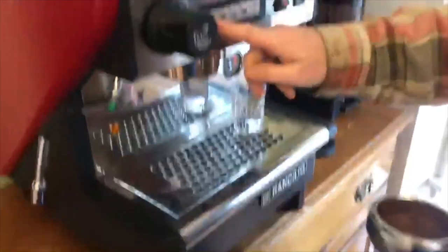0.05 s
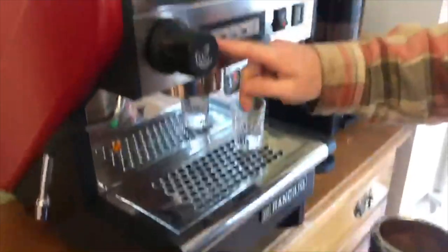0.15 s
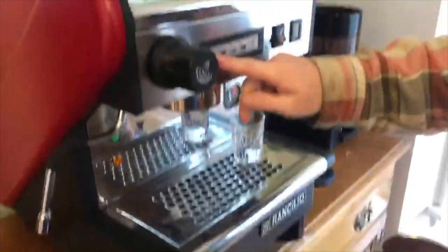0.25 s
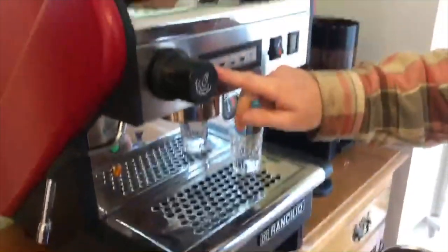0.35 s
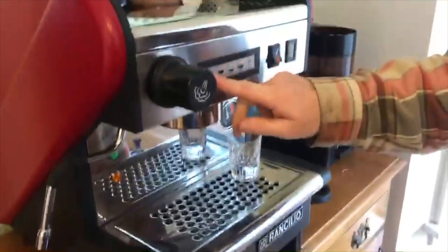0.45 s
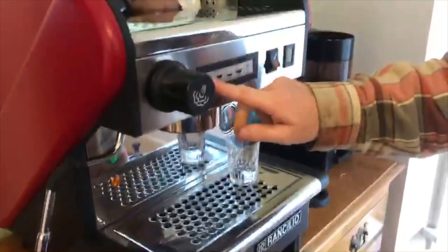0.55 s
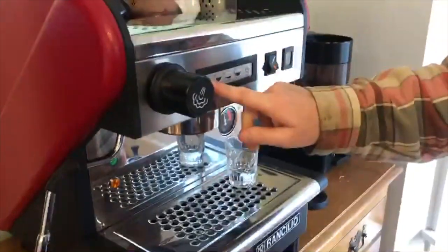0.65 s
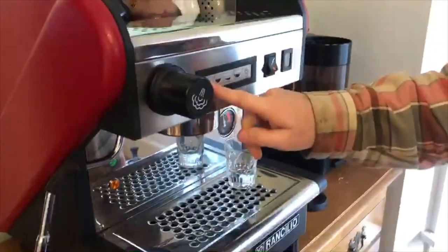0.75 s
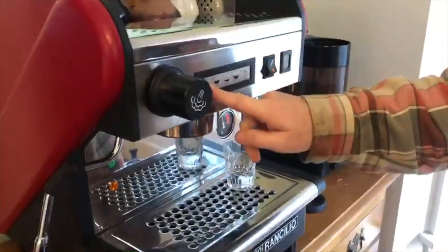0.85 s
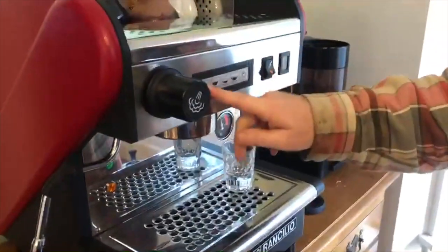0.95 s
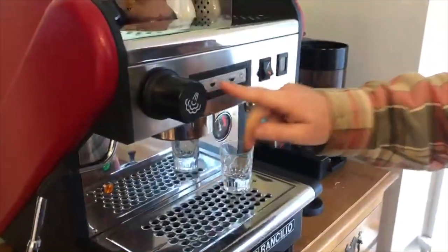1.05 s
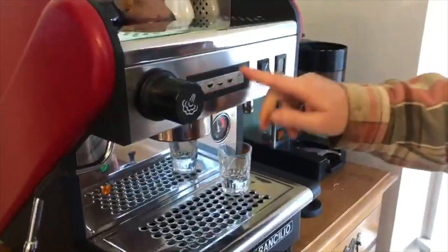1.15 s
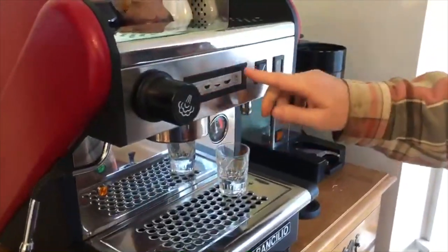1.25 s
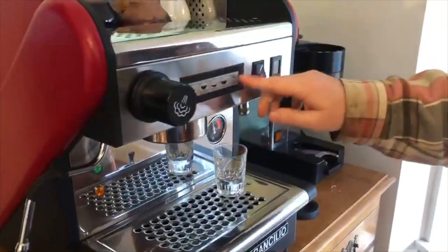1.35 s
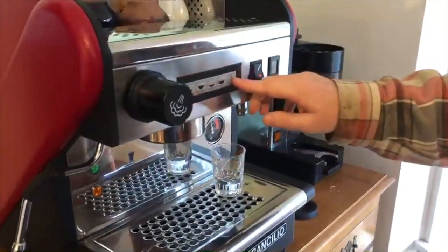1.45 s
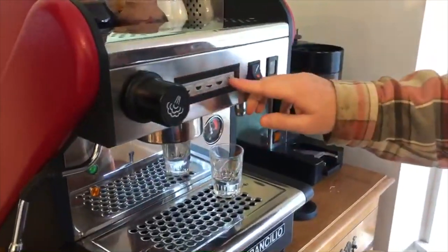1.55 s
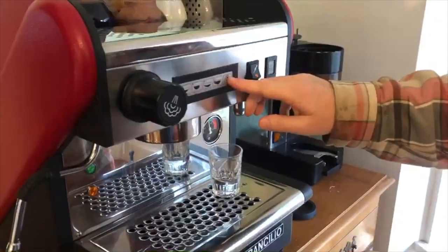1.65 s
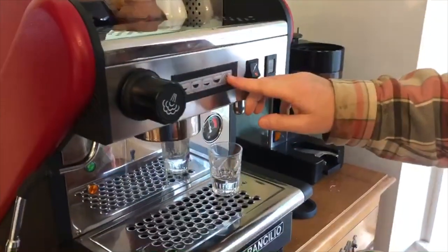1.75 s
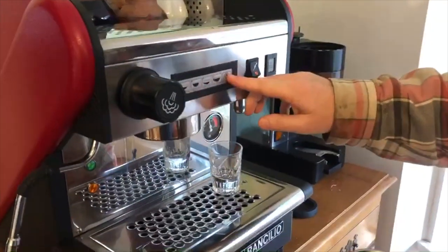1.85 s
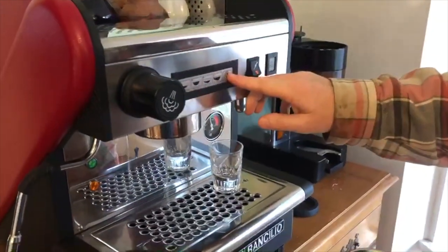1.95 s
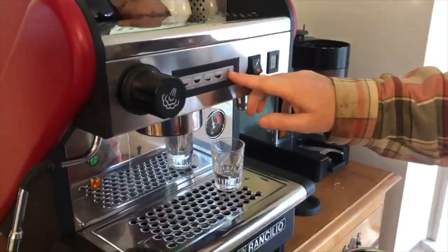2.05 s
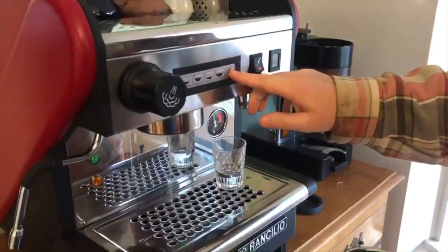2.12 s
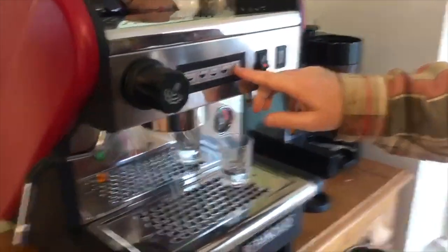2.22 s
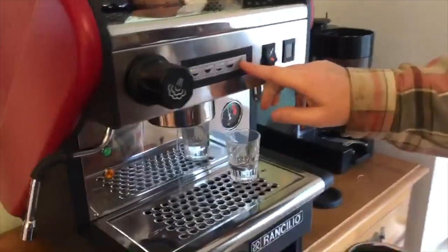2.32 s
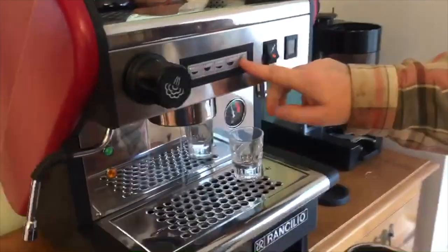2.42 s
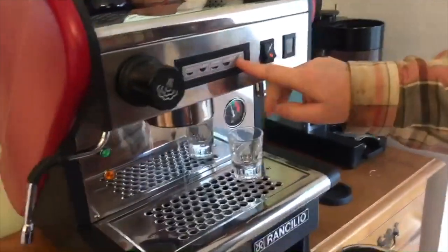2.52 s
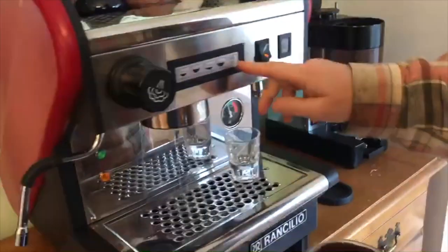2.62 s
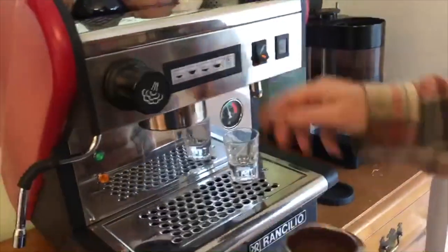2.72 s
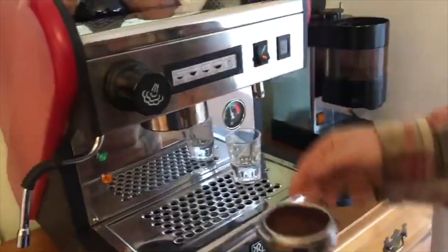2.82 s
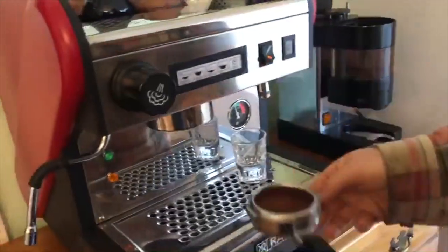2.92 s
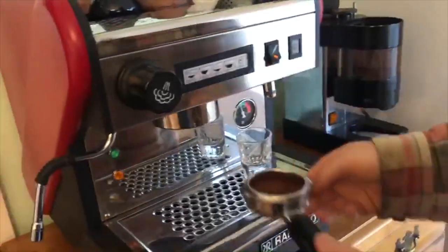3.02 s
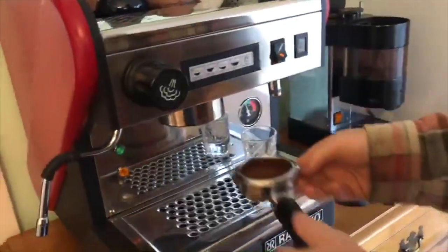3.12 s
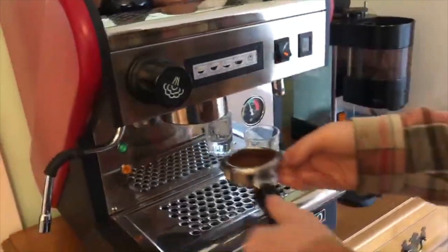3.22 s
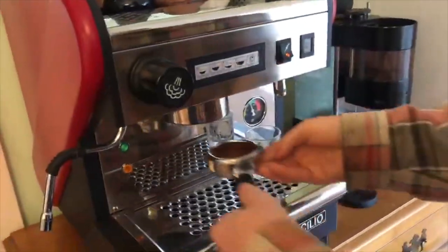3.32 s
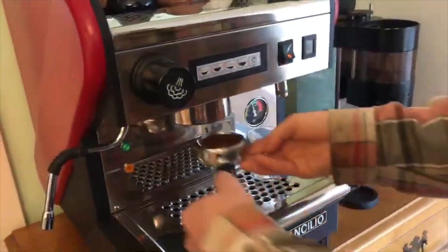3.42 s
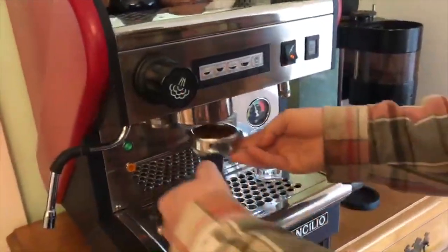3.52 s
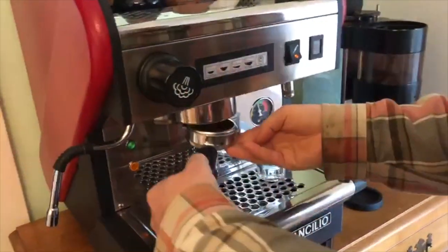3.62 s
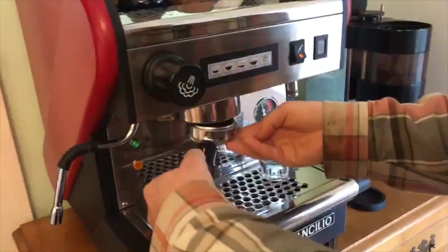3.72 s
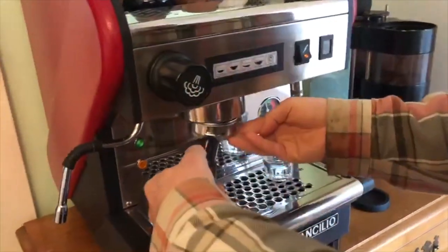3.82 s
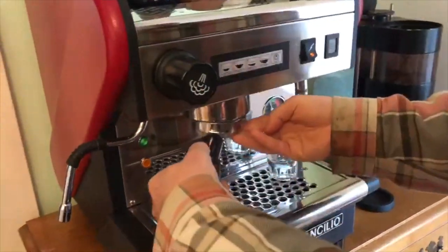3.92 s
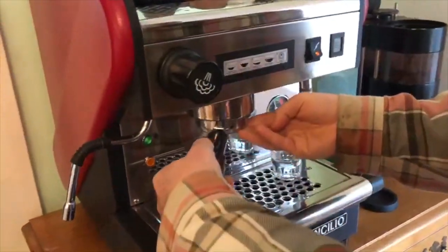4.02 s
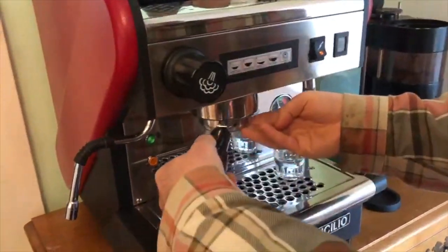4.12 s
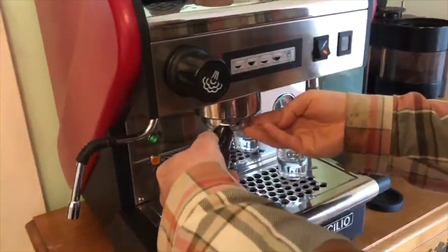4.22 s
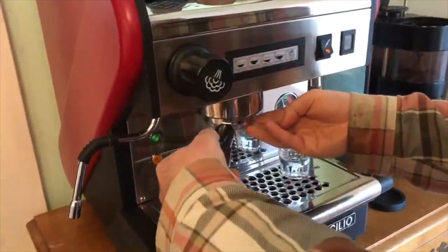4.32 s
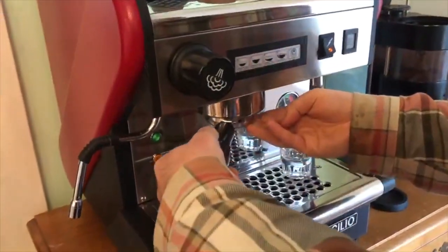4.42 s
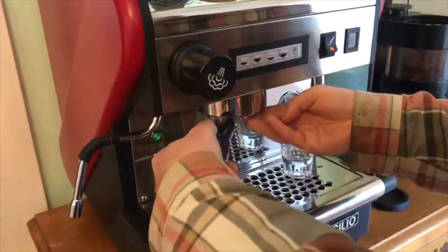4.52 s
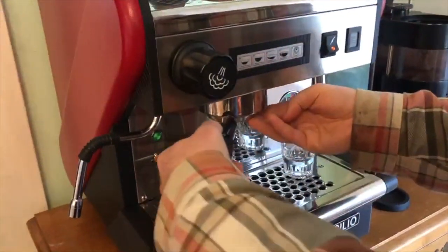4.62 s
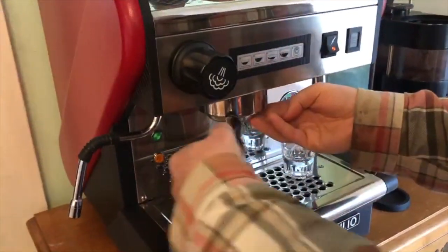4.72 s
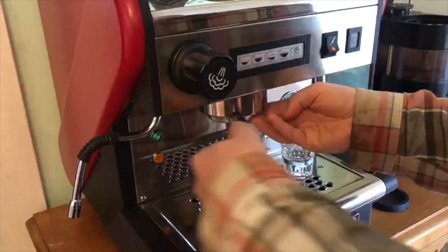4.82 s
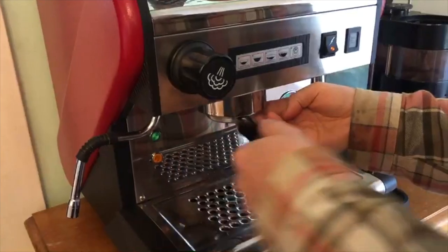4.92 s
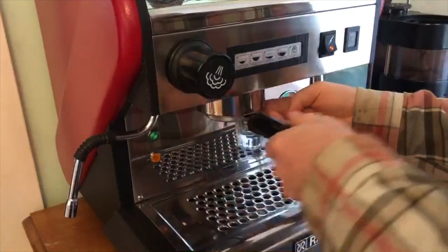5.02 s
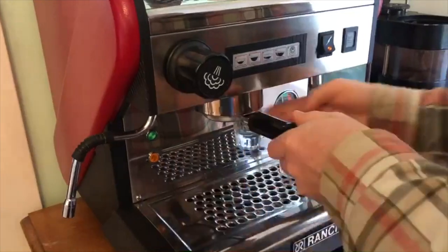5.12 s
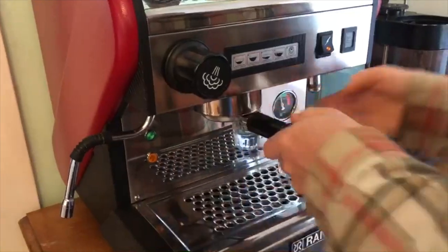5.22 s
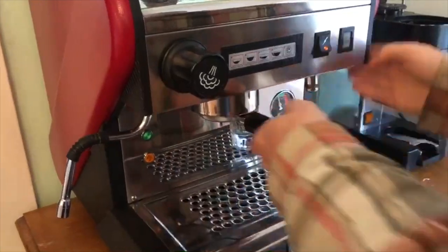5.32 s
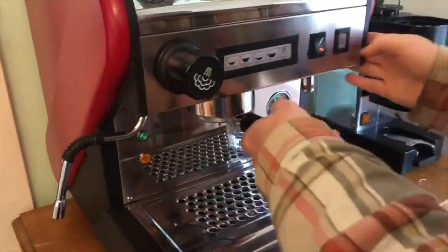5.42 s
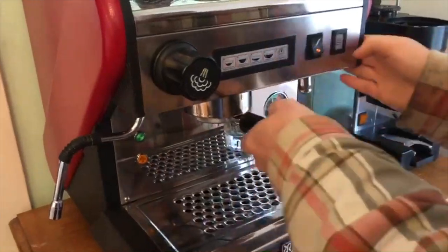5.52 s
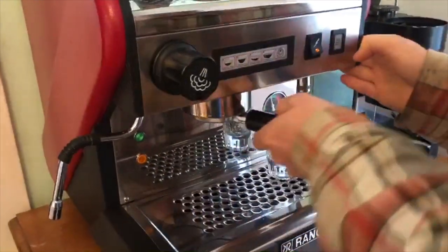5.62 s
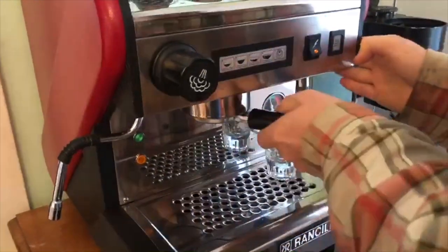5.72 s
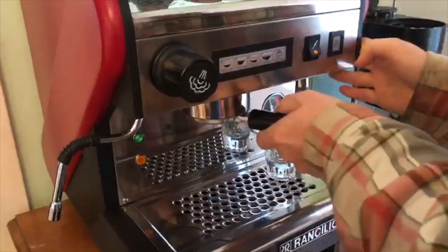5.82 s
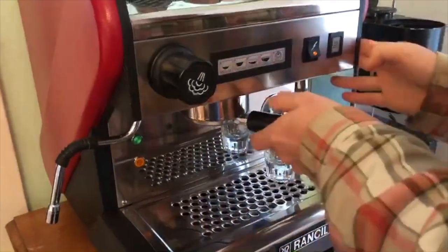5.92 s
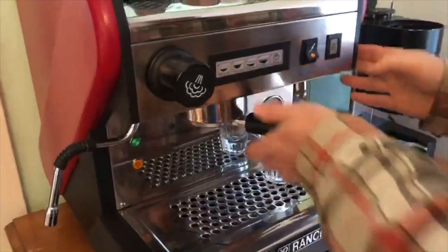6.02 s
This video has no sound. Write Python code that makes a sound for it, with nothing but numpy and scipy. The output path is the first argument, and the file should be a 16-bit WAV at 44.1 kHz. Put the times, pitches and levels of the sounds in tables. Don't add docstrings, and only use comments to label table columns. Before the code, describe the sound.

A small handheld microphone near an espresso machine. Soft fingertip touches lead to a bright, crisp button click that rattles the front panel. A low motor hum with a thin whine and hissing water runs about a second and a half, with irregular drips, and winds down. Quiet cloth rustle follows, then solid metal clunks, a short grinding twist of the handle, and faint taps in a lightly reverberant kitchen.

```python
import sys
import numpy as np
from scipy import signal
from scipy.fft import rfft, irfft
from scipy.io import wavfile
from scipy.ndimage import uniform_filter1d

SR = 44100
rng = np.random.default_rng(int(sys.argv[2]) if len(sys.argv) > 2 else 0)


def unload_wav(signal):
    wavfile.write(
        sys.argv[1],
        SR,
        np.round(np.clip(np.atleast_2d(signal).T, -1, 1) * 32767).astype(np.int16),
    )


def how_loud(loudness_db):
    steps = np.asarray(loudness_db, float) / 20
    return 10 ** steps


N = 267246
T = np.arange(N) / SR

SHAFT_HZ, MAINS_HZ, ROTOR_SLOTS = 28.53, 120, 34
VALVE_S, UP_TO_SPEED_S, POWER_OFF_S = 0.84, 1.0, 2.465
SWITCH_S, SWITCH_DB = 0.7972, -18

# mains sideband step (negative: mains hum itself), level in dB.
SLOT_LINES = [(-4.5, -8), (2, -10), (3, 0.5), (-34, -33)]
# shaft order, level in dB re rumble.
SHAFT_ORDERS = [(2, -11), (7, -9.5), (8, -11.5), (11, -18), (14, -24.5), (15, -18), (18, -16), (20, -18.5),
                (22, -16), (30, -16)]
# shaft order, level in dB.
VANE_ORDERS = [(23, -10.5), (24, -2), (25, -5.5), (26, -11.5), (27, -16)]
# frequency in Hz, density in dB per Hz.
RUMBLE_SPECTRUM = [(20, -50), (38, -23), (55, -2.5), (100, -6.5), (140, -3.5), (175, -4), (220, -3),
                   (300, -5), (480, -12.5), (680, -11.5), (1000, -14.5), (1450, -18.5), (2200, -47)]
# frequency in Hz, density in dB per Hz.
HISS_SPECTRUM = [(880, -37), (1500, 4), (1710, -2.5), (3250, -6.5), (5440, -9.5), (6180, -9), (9470, -16),
                 (10100, -18), (15000, -18.5), (15700, -17.5), (16500, -20.5)]
# frequency in Hz, level in dB.
PIPE_TONES = [(4082, -75), (4422, -79.5), (4592, -81), (5050, -78), (5249, -73.5), (5336, -80.5),
              (5421, -73), (5453, -77.5), (5483, -79.5), (5593, -80.5), (5650, -75), (5906, -77),
              (6021, -81), (6534, -80), (6966, -77.5), (7180, -78.5), (7768, -82), (9518, -84.5)]
# centre in Hz, width in Hz, level in dB.
PIPE_RESONANCES = [(1860, 61, -9.5), (5400, 700, -5), (6500, 300, -15.5), (7680, 220, -15.5),
                   (8500, 400, -14), (9100, 150, -16), (9470, 160, -11.5), (10800, 220, -19.5)]
# time in seconds, ease in dB.
FLOW_EASE = [
    (.976, 14.5),
    (1.06, -1),
    (1.52, 0.5),
    (1.555, -3.5),
    (1.65, 2.5),
    (1.7, -3.5),
    (2.116, 2.5),
    (2.22, 1),
    (2.46, 2.5),
]
# start in seconds, peak in dB, pitch in Hz.
DRIPS = [(0.9837, -58, 2200), (1.1489, -34.5, 2500), (1.2192, -40.5, 1900), (1.3373, -45, 1960),
         (1.4002, -44, 2770), (1.4666, -51, 2760), (1.5963, -43, 1910), (1.6363, -38.5, 2010),
         (1.6845, -43, 3250), (1.8018, -36.5, 2450), (1.8687, -49, 1910), (1.9797, -45, 1910),
         (2.1044, -46, 2970), (2.164, -38, 3000), (2.1778, -36, 1850), (2.2917, -40, 1960),
         (2.454, -47.5, 2150)]
# frequency in Hz, level in dB, T60 in seconds.
TRAY_MODES = [(1910, -4.5, 0.08), (2097, -1, 0.032), (2550, -11, 0.048), (3000, -8.5, 0.032),
              (3360, 0.5, 0.039), (3810, -9, 0.046)]

# frequency in Hz, density in dB per Hz.
SWITCH_SPECTRUM = [(180, -59.5), (300, -28.5), (828, -15.5), (2100, -9.5), (3350, -11.5), (4370, -24),
                   (6100, -6), (7080, -20), (8500, -3.5), (11900, -3.5), (12900, -19), (15200, 0.5),
                   (16000, -17)]
# frequency in Hz, density in dB per Hz.
RATTLE_SPECTRUM = [(240, -45.5), (400, -19.5), (742, -7), (879, -4.5), (1250, -11), (1710, -3),
                   (2020, -12.5), (3370, -9), (4730, -25.5), (8370, -11.5), (16000, -16.5)]
# frequency in Hz, level in dB, T60 in seconds.
ROCKER_MODES = [(1900, -4.5, 0.013), (2500, -9.5, 0.016), (6250, -12.5, 0.018), (8860, -1, .014),
                (9600, -5.5, .018), (10790, 0.5, .015), (11910, 1, 0.011), (13200, -6, .012),
                (13970, -6, 0.014), (15200, -4.5, 0.015)]
# frequency in Hz, level in dB, T60 in seconds.
FRONT_PANEL_MODES = [(873, -10, 0.15), (1420, -12.5, 0.12), (1800, -13, 0.2), (2170, 2.5, 0.17),
                     (2800, -6, .2), (3300, -8, .2), (6116, -7.5, 0.32), (9100, -9.5, 0.15),
                     (9390, -10, 0.23), (9430, -5, 0.073), (10090, -13.5, 0.46), (10860, -14, 0.13),
                     (11270, -18.5, 0.51), (12500, -11, 0.23), (14060, -7, 0.2057), (15000, -6.5, 0.29),
                     (15370, -10.5, 0.18)]

# start in seconds, crack in dB, crack
# colour in Hz, body in dB, body colour in Hz.
KNOCKS = [(0.2716, -57.5, 3460, -57.5, 1030), (3.7979, -23.5, 3570, -31.5, 670),
          (4.1091, -42.5, 3300, -38, 940), (4.2645, -49, 2800, -41.5, 836), (4.4607, -27, 3400, -31.5, 590),
          (4.7077, -44.5, 3260, -41, 594), (4.8062, -29.5, 4930, -42, 706), (4.9273, -31, 3530, -43, 940),
          (5.523, -40.5, 1710, -48.5, 1000), (5.6843, -46.5, 2290, -54, 960),
          (5.8504, -57.5, 2000, -56, 790)]
# start in seconds, crack in dB, body in dB, thud in dB.
TOUCHES = [(0.0004, -68, -62, -49), (0.082, -64, -79, -62), (3.6496, -62, -70, -76),
           (3.7314, -64, -72, -71), (4.499, -58.5, -46.5, -33), (4.5595, -58, -78, -43.5),
           (4.6686, -61, -60, -49), (5.0419, -57, -76, -57), (5.6467, -56, -59, -48.5),
           (5.662, -51, -65, -59), (5.7339, -66, -61, -49.5), (5.8975, -57.5, -84, -80),
           (5.9532, -58, -74, -74), (5.9976, -56, -52.5, -51)]
# frequency in Hz, level in dB, T60 in seconds.
SHEET_MODES = [(1644, 16.5, 0.33), (1723, 1, 0.72), (2000, 9, 0.17), (2290, -12, 0.36), (2470, 4, 0.056),
               (2860, 9, 0.28), (3400, 2, 0.035), (4940, 5, 0.19), (5710, -17, 0.21)]
# frequency in Hz, level in dB, T60 in seconds.
BREW_HEAD_MODES = [(424.5, -4.5, 0.9), (507, -2.5, .6), (636.2, 1.5, 0.51), (711, -5.5, .5),
                   (858, -4, 0.41), (1008.4, -10, 0.64), (1233, -4.5, 0.28)]
# frequency in Hz, level in dB, T60 in seconds.
CABINET_MODES = [(105.3, -7.5, 0.11), (156.6, -8.5, 0.24), (202, -0.5, 0.25), (223.6, 2, 0.22),
                 (255, -6.5, 0.25), (331.6, -10.5, .2)]
# start in seconds, peak in dB, pitch in Hz, ring in seconds.
BUMPS = [(.008, -49.5, 142, 0.065), (4.15, -45, 520, 0.16), (4.285, -45, 463, 0.36),
         (4.5, -40.5, 595, 0.22), (4.57, -49, 102.3, 0.37), (5.73, -48, 200, .07), (2.56, -48, 199, .3),
         (2.6, -51, 90, 0.35), (5.645, -52, 313, 0.16), (5.985, -47, 383, 0.1), (6.02, -54, 408, 0.24)]
# start in seconds, peak in dB, pitch in Hz, ring in seconds.
TICKS = [(2.2223, -33, 7800, 0.038), (2.224, -39, 13500, .02), (2.527, -55, 6170, 0.026),
         (2.532, -49, 5200, 0.17), (2.552, -60.5, 9700, .015), (2.575, -63, 9600, .015),
         (2.6284, -46, 11900, 0.012), (2.6429, -46, 8650, 0.035), (2.644, -49.5, 11480, 0.032),
         (4.668, -60.5, 3350, .03), (4.677, -66, 2800, .03), (4.535, -59, 12000, .02),
         (5.045, -60, 12400, 0.036), (5.5638, -55, 14500, .03)]
# start in seconds,
# peak in dB, pitch in Hz, ring in seconds.
SQUEAKS = [(.115, -62, 4400, 0.072), (.128, -57.5, 2860, 0.077), (.15, -56.5, 2550, 0.095),
           (4.7, -71, 2620, .2), (3.803, -39, 1580, 0.068), (4.777, -60, 5200, .08), (4.13, -64, 2880, .3),
           (5.69, -58, 3400, .03), (.93, -41, 1800, 0.092), (.945, -39.5, 2550, 0.14),
           (0.89, -41, 2150, .08), (2.474, -38, 1063, 0.027), (2.476, -44.5, 1900, 0.044)]
# start in seconds, peak in dB, pitch in Hz, ring in seconds.
FINGER_TAPS = [(4.461, -42, 7400, .025), (4.462, -45, 11900, .03), (4.474, -52, 7660, .02),
               (4.111, -56.5, 10100, 0.014), (4.7075, -57, 8500, .02), (.272, -61, 13200, 0.0089),
               (.2725, -59, 7460, 0.0072), (.648, -67, 6900, .012), (.775, -57, 11700, 0.022),
               (.787, -62.5, 10870, 0.0086), (.965, -48, 10000, .01)]

# full level in seconds, end in seconds, level in dB.
LUG_TURNS = [
    (4.71, 4.79, -63),
    (4.82, 4.92, -59.5),
    (4.93, 4.94, -62),
    (4.95, 5.04, -66),
]
# centre in Hz, width in Hz, level in dB.
LUG_RESONANCES = [(520, 120, 11.5), (900, 50, 1), (1460, 75, -17), (2500, 170, -11), (4400, 2800, -2.5),
                  (5720, 190, -7), (8220, 150, -11)]
# full level in seconds, end in seconds, level in dB.
CLOTH_STROKES = [(.088, .11, -72.5), (.272, .28, -89), (.355, .405, -69.5), (2.62, 3.02, -72),
                 (3.09, 3.3, -72), (3.36, 3.56, -76.5), (3.75, 3.76, -77), (4.49, 4.545, -66),
                 (5.19, 5.3, -63.5), (5.4, 5.5, -78), (5.58, 5.72, -69), (5.8, 5.9, -82),
                 (5.955, 6.06, -71)]
# frequency in Hz, density in dB per Hz.
CLOTH_SPECTRUM = [(710, -31), (1200, 3.5), (1420, -0.5), (3400, 2.5), (16000, -7.5)]
# full level in seconds, end in seconds, level in dB.
ARM_STIRS = [
    (0, .02, -63),
    (2.7, 3.4, -65),
    (4.5, 4.75, -58.5),
    (5.9, 6.06, -67.5),
]
# frequency in Hz, density in dB per Hz.
HUSH_SPECTRUM = [(20, -51.5), (40, -14.5), (55, -3), (85, -2), (125, -5.5), (170, -3.5), (230, -6.5),
                 (384, -13), (607, -17), (1940, -28), (5000, -39), (16000, -44.5)]
# frequency in Hz, T60 in seconds.
KITCHEN_T60 = [(150, 0.91), (600, .7), (2000, 0.47), (6000, 0.27), (14000, 0.22)]


def pump():
    shaft_hz = speed() * (1 + 0.0015 * slow(6))

    def order_hz(k):
        return k * shaft_hz

    def slot_hz(k):
        return np.where(k < 0, MAINS_HZ, ROTOR_SLOTS * shaft_hz + k * MAINS_HZ)

    def pipe_hz(hz):
        return hz * speed() / SHAFT_HZ * (1 + 0.0006 * slow(15))

    drone = tones(order_hz, [(5, -1.1)], 2.16, 22)
    drone = drone + how_loud(-9.5) * evened(band(rng.standard_normal(N), 150, 156))
    rumble = noise(RUMBLE_SPECTRUM, 0.84, size=2048) + tones(order_hz, SHAFT_ORDERS, 2.5, 20)
    vanes = tones(order_hz, VANE_ORDERS, 2.1, 14)
    whine = tones(slot_hz, SLOT_LINES, 0.23, 26)
    hiss = how_loud(-3.5) * noise(HISS_SPECTRUM, 1.2) + how_loud(-6.5) * resonant(PIPE_RESONANCES)
    hiss = hiss + how_loud(51.5) * tones(pipe_hz, PIPE_TONES, 2.4, 10)

    flow_db = np.interp(T, *np.transpose(FLOW_EASE))
    pressure = np.clip((T - UP_TO_SPEED_S) / (POWER_OFF_S - UP_TO_SPEED_S), 0, 1)
    drone_db = swell(-40.5, 1.06, 199.5, 2.52, 152) + flow_db
    rumble_db = swell(-45, 1.04, 42.5, 2.5, 106) + 0.2 * flow_db
    vanes_db = swell(-58, 0.93, 280, POWER_OFF_S, 340) + 12 * pressure - 0.6 * flow_db
    whine_db = swell(-46, 0.98, 340, POWER_OFF_S, 400) - 5.5 * pressure
    motor = how_loud(drone_db) * drone + how_loud(rumble_db) * rumble + how_loud(vanes_db) * vanes + how_loud(whine_db) * whine
    add(motor, 2.5, how_loud(-55.5) * ring([(1331, 0, 0.55)], 1.6, 0.016, 0.75, detune=0.0081))
    return motor * (T > VALVE_S) + water() * hiss


def speed():
    bend = 1.8
    spin_up_hz = 328 * np.maximum(UP_TO_SPEED_S - T, 0) ** bend
    coast_hz = 145 * np.maximum(T - POWER_OFF_S, 0) ** bend
    return np.maximum(SHAFT_HZ - (spin_up_hz + coast_hz), 1)


def water():
    gush_db = 7 * np.exp(-abs(T - VALVE_S) / 0.045)
    stream = how_loud(swell(-53.5, 0.96, 50, POWER_OFF_S, 170) + gush_db)
    dribble = how_loud(swell(-70, 6, 50, 2.5, 200))
    return np.hypot(stream, dribble) * (T > VALVE_S)


def spatter():
    drops = how_loud(4.7 * np.minimum(rng.exponential(1, N), 2.5)) * (rng.random(N) < 45 / SR)
    spray = signal.oaconvolve(drops, burst(0.005, 0.0018))[:N]
    return how_loud(-10.5) * water() * evened(band(spray, 1600, 3700))


def drips():
    ring_s = 0.046
    out = how_loud(-5.5) * chirps([(*row, ring_s) for row in DRIPS], 1.5, 0.0078)
    for s, db, hz in DRIPS:
        add(out, s, how_loud(db - 6) * ring(TRAY_MODES, 5.2, 0.0011, 1.3))
    return out


def switch():
    slips = [(0, -32), (0.002, -8), (0.0028, 2), (0.0036, -4.5), (0.0052, -6.5)]  # (s, dB)
    snap = sum(how_loud(db) * np.roll(burst(0.001, 0.0004), round(s * SR)) for s, db in slips)
    rattle = burst(0.012, 0.004) + how_loud(-10) * burst(0.033)
    head = favour(BREW_HEAD_MODES, 830, 8)
    cabinet = favour(CABINET_MODES, 200, 8)
    out = np.zeros(N)
    add(out, SWITCH_S - 0.002, how_loud(-1) * coloured(snap, SWITCH_SPECTRUM))
    add(out, SWITCH_S + 0.00024, how_loud(-1.5) * ring(ROCKER_MODES, 1.7, 0.00052, 0.35))
    add(out, SWITCH_S + 0.0032, how_loud(-8) * ring(ROCKER_MODES, 2.0, 0.0003, 0.2, detune=0.03))
    add(out, SWITCH_S, how_loud(-13.5) * coloured(rattle, RATTLE_SPECTRUM))
    add(out, SWITCH_S, how_loud(-31) * peaked(band(burst(0.03, 0.0027), 4500, 17000, order=1)))
    add(out, SWITCH_S, how_loud(-19.5) * ring(FRONT_PANEL_MODES, 2.5, 0.0027, 0.4, detune=0.04))
    add(out, SWITCH_S, how_loud(-33) * ring(head, 1.2, 0.0057, 0.3, detune=0.04))
    add(out, SWITCH_S, how_loud(-27) * ring(cabinet, 2.0, 0.011, 0.9))
    return how_loud(SWITCH_DB + 11) * out


def knocks():
    out, pings = np.zeros((2, N))
    for s, crack_db, crack_hz, body_db, body_hz, thud_db in contacts():
        soft = np.clip((-43.5 - crack_db) / 14, 0, 1)
        crack = burst(0.0048 + 0.0036 * soft, 0.000075 + 0.00086 * soft)
        add(out, s, how_loud(crack_db - 1.5) * peaked(band(crack, 1230, 4270)))
        add(pings, s, how_loud(crack_db - 6.5) * ring([(crack_hz, 0, 0.025)], 2.6, 0.00028, 0.84, detune=0.043))
        sheets = favour(SHEET_MODES, crack_hz, 3)
        add(out, s, how_loud(crack_db - 12) * ring(sheets, 2.7, 0.00063, 0.48, detune=0.0367))
        sparkle = burst(0.0022, 0.0004) + 0.27 * burst(0.0091)
        sparkle_db = crack_db - 17.5 - 4 * soft + 3.6 * np.log2(crack_hz / 3500)
        add(out, s, how_loud(sparkle_db) * peaked(band(sparkle, 3700, 12000)))
        add(out, s, how_loud(crack_db - 27) * peaked(band(burst(0.035, 0.0039), 1100, 4900, order=1)))
        head = favour(BREW_HEAD_MODES, body_hz, 13)
        add(out, s, how_loud(body_db) * ring(head, 2.4, 0.0035, 0.46, detune=0.025))
        blur = band(burst(0.013, 0.0039), body_hz / 1.28, body_hz * 1.87)
        add(out, s + 0.001973, how_loud(body_db + 1.5) * peaked(blur))
        add(out, s, how_loud(body_db - 13) * peaked(band(burst(0.045, 0.006), 360, 1400, order=1)))
        add(out, s + 0.003, how_loud(thud_db) * ring(CABINET_MODES, 2.6, 0.015, 0.65))
    return out, pings


def contacts():
    crack_hz, body_hz = 2800, 624
    hard = [(*row, row[3] - 2.5) for row in KNOCKS]
    light = [(s, crack_db, crack_hz, body_db, body_hz, thud_db) for s, crack_db, body_db, thud_db in TOUCHES]
    return sorted(hard + light)


def twist():
    return gestures(LUG_TURNS, 950, 190) * how_loud(-9 + 2.5 * slow(40)) * resonant(LUG_RESONANCES)


def sleeves():
    return gestures(CLOTH_STROKES, 310, 160) * noise(CLOTH_SPECTRUM, 2.2, size=256)


def kitchen(x, count=5):
    taps = np.zeros((count, SR // 2))
    at = np.arange(200, SR // 2 - 20, 20)
    at = at + rng.integers(0, 20, (count, len(at)))
    np.put_along_axis(taps, at, rng.choice([-1., 1.], at.shape), 1)
    hz, t, z = signal.stft(taps, SR, nperseg=256)
    decay_db = -60 * t / read(KITCHEN_T60, hz)[:, None]
    tails = signal.istft(z * how_loud(decay_db), SR, nperseg=256)[1]
    turn = np.floor(T / 0.155).astype(int) % count
    return sum(signal.oaconvolve(x * (turn == k), tail / np.linalg.norm(tail))[:N]
               for k, tail in enumerate(tails))


def hush():
    return np.hypot(how_loud(-63), gestures(ARM_STIRS, 12, 16)) * noise(HUSH_SPECTRUM, 1.3, size=2048)


def tones(hz, lines, waver_db, rate_hz):
    out = 0
    for k, db in lines:
        gain = how_loud(db + waver_db * slow(rate_hz)) * np.sqrt(2)
        out = out + gain * np.sin(2 * np.pi * (np.cumsum(hz(k)) / SR + rng.random()))
    return out


def noise(spectrum, patchy_db, size=1024):
    hz = np.fft.rfftfreq(size, 1 / SR)
    a, b, patches = rng.standard_normal((N * 4 // size + 5, len(hz), 3)).T
    patches = uniform_filter1d(patches, size // 80, 0)
    patches = evened(uniform_filter1d(patches, 12000 // size, 1))
    z = (a + 1j * b) * how_loud(read(spectrum, hz)[:, None] + patchy_db * patches)
    return evened(signal.istft(z, nperseg=size, noverlap=size * 3 // 4)[1][:N])


def resonant(peaks):
    white = rng.standard_normal(N)
    return sum(how_loud(db) * evened(band(white, hz - width_hz / 2, hz + width_hz / 2)) for hz, width_hz, db in peaks)


def ring(modes, spread_db, rise_s, damping, detune=0.024):
    hz, db, t60 = np.repeat(modes, 8, axis=0).T[:, :, None]
    gain, off, phase = rng.standard_normal((3, len(hz), 1))
    off = 0.3 * off + np.tile(np.linspace(-1.5, 1.5, 8), len(modes))[:, None]
    size = 16384
    loss_hz = np.log(1000) / np.clip(t60 * damping, 0.004, 0.5) / (2 * np.pi)
    distance_hz = np.fft.rfftfreq(size, 1 / SR) - hz * (1 + detune * off)
    lines = how_loud(db + spread_db * gain) * np.exp(2j * np.pi * phase) / (loss_hz + 1j * distance_hz)
    t = np.arange(size) / SR
    envelope = (1 - np.exp(-t / rise_s)) * np.cos(np.pi / 2 * t / t[-1])
    return peaked(irfft(lines.sum(0), size) * envelope)


def favour(modes, hz, slope_db):
    return [(f, db - slope_db * abs(np.log2(f / hz)), t60) for f, db, t60 in modes]


def chirps(rows, spread, rise_s):
    out = np.zeros(N)
    for s, db, hz, ring_s in rows:
        puff = burst(ring_s / np.log(1000), rise_s)
        core = band(puff, hz / 1.03, hz * 1.03)
        neighbours = band(puff, hz / spread, hz * spread)
        add(out, s, how_loud(db) * peaked(core + 0.49 * neighbours))
    return out


def burst(decay_s, rise_s=0.00024):
    t = np.arange(SR // 6) / SR
    fade = np.cos(3 * np.pi * t) ** 2
    return rng.standard_normal(len(t)) * (1 - np.exp(-t / rise_s)) * np.exp(-t / decay_s) * fade


def coloured(x, spectrum):
    gain = how_loud(read(spectrum, np.fft.rfftfreq(len(x), 1 / SR)))
    return peaked(irfft(rfft(x) * gain, len(x)))


def swell(db, full_s, rise_db, end_s, fall_db):
    return db - rise_db * np.maximum(full_s - T, 0) - fall_db * np.maximum(T - end_s, 0)


def gestures(rows, rise_db, fall_db):
    return sum(how_loud(swell(db, full_s, rise_db, end_s, fall_db)) for full_s, end_s, db in rows)


def slow(rate_hz):
    knots = rng.standard_normal(int(N / SR * rate_hz) + 3)
    path = np.interp(T * rate_hz, np.arange(len(knots)), knots)
    return 1.2 * uniform_filter1d(path, int(SR / rate_hz / 2))


def band(x, lo_hz, hi_hz, order=2):
    edges_hz = [lo_hz, min(hi_hz, 0.45 * SR)]
    return signal.sosfilt(signal.butter(order, edges_hz, "band", fs=SR, output="sos"), x)


def read(points, hz):
    f, value = np.transpose(points)
    return np.interp(np.log(hz + 1), np.log(f + 1), value)


def evened(x):
    return x / np.sqrt(np.mean(x ** 2) + 1e-20)


def peaked(x):
    return x / abs(x).max()


def add(mix, s, sound):
    part = mix[round(s * SR):][:len(sound)]
    part += sound[:len(part)]


def scene():
    snap = switch()
    blows, pings = knocks()
    squeaks = chirps(SQUEAKS, 1.32, 0.0068)
    near = blows + chirps(BUMPS, 1.26, 0.0038) + drips()
    near = near + how_loud(-11) * squeaks + chirps(TICKS, 1.32, 0.000092)
    echoes = kitchen(how_loud(-7) * snap + how_loud(-9.5) * near)
    direct = snap + near + pings + how_loud(-2.5) * squeaks + chirps(FINGER_TAPS, 1.3, 0.0003)
    machine = pump() + spatter() + twist()
    return (direct + echoes + machine + sleeves() + hush())[None]


def band_limit(x):
    return signal.sosfilt(signal.butter(12, 16670, fs=SR, output="sos"), x)


def record(dry):
    x = signal.sosfilt(signal.butter(4, 48, "high", fs=SR, output="sos"), dry)
    low_pass = signal.firwin(1023, 15790, window=("kaiser", 9), fs=SR)
    x = signal.oaconvolve(x, low_pass[None], "same")
    return band_limit(x)


dry = scene()
out = record(dry)
unload_wav(out)
```